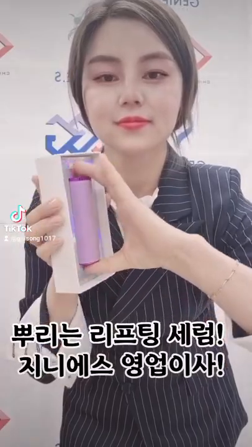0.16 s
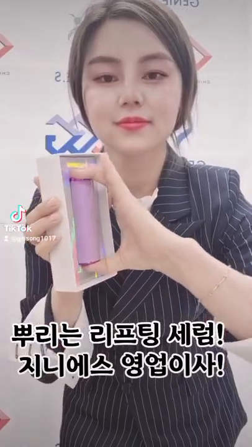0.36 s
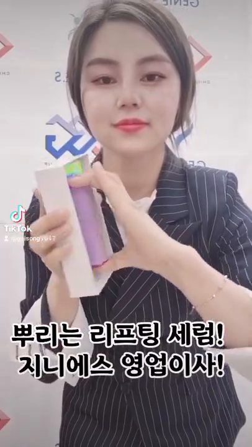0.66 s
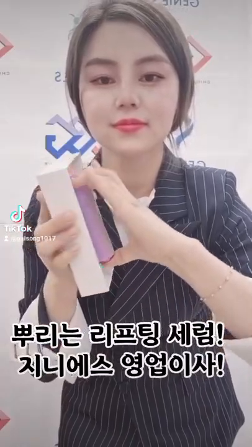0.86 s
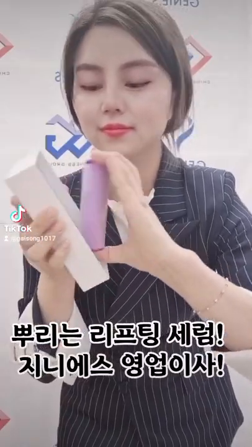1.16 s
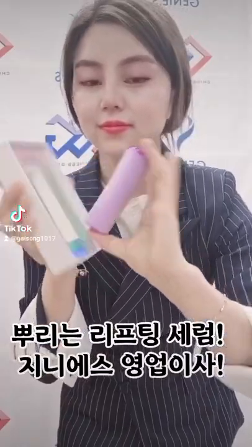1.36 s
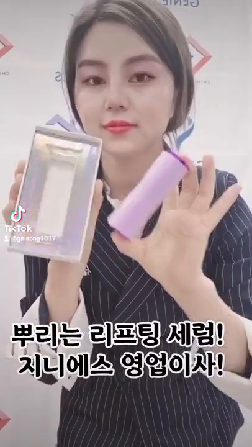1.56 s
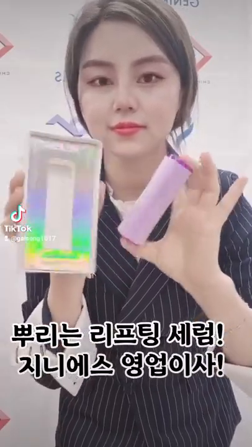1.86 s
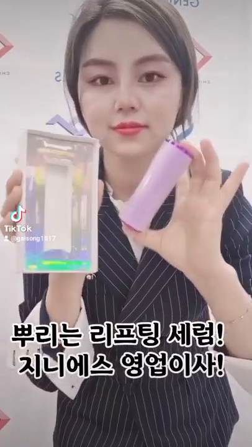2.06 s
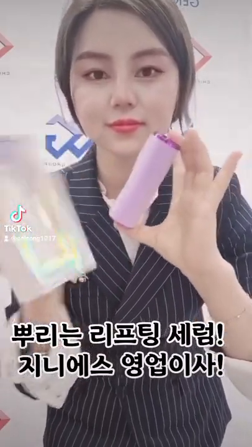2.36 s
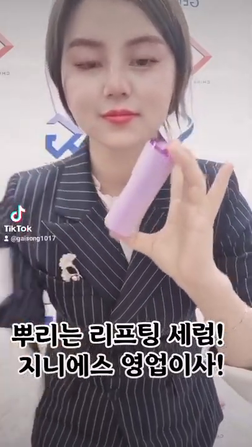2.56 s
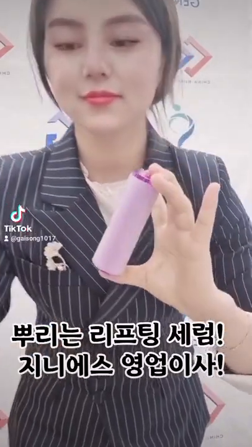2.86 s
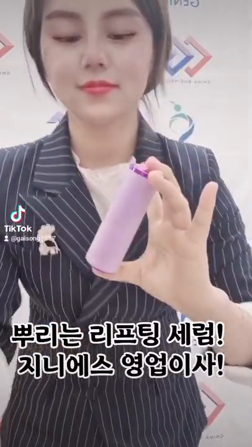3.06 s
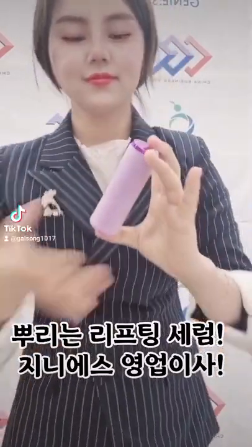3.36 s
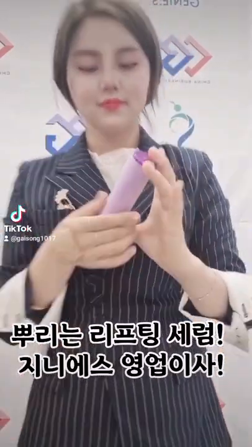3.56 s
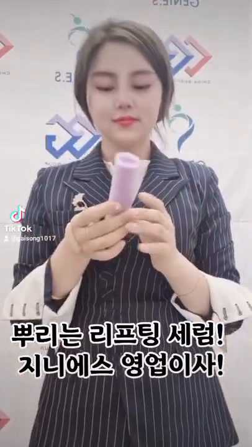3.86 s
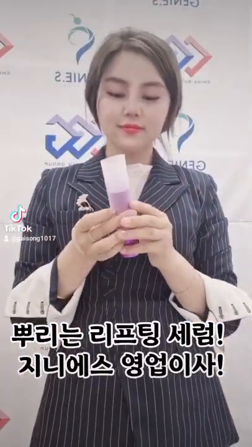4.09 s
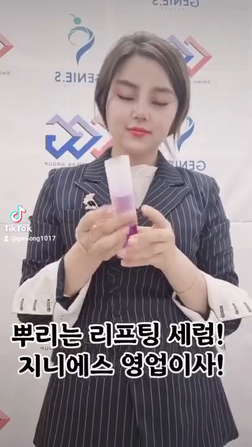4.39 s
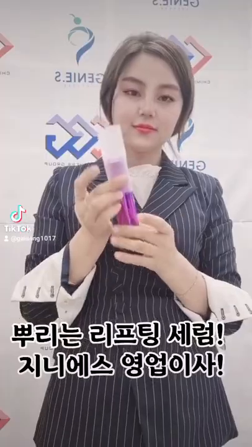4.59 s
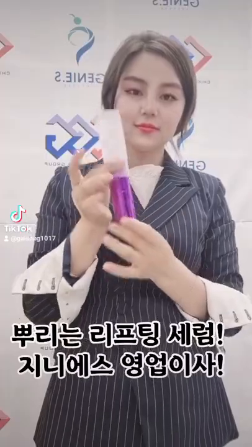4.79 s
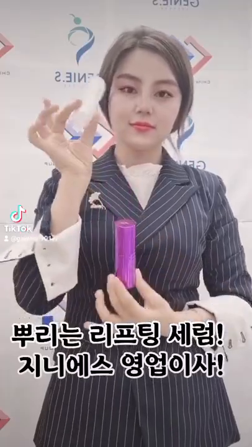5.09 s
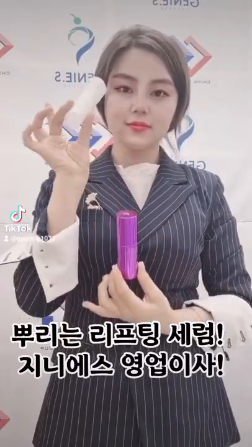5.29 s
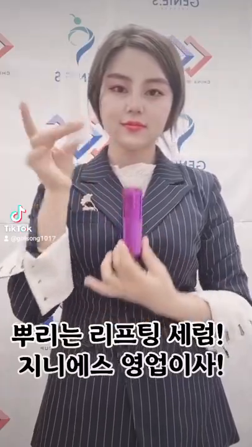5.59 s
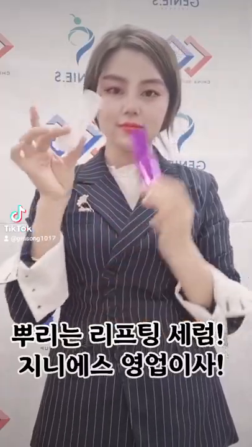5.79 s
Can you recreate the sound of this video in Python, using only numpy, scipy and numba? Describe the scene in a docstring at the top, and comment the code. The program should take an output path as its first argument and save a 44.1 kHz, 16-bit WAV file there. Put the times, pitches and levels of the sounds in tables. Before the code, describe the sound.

Faint rubbing and plastic ticks in a quiet room, broken by a cardboard box clattering onto a table, then a cap clicks off.

```python
"""A cardboard box drops on a table, bounces and settles, its contents rattling: each impact flexes a panel
and excites the damped modes of box and table top. Beforehand a bottle is worked out of the tight box, its
friction noise filtered by a hollow of rising pitch; afterwards its cap is pulled off. The plastic ticks by
resonance and rasps by stick-slip. Jacket cloth rustles with the arms, ventilation and far traffic rumble
under microphone hiss, and the quiet room reverberates briefly."""
import sys
import numpy as np
from scipy import signal
from scipy.fft import rfft, irfft
from scipy.io import wavfile
from scipy.ndimage import uniform_filter1d
from numba import njit

SR = 44100
rng = np.random.default_rng(int(sys.argv[2]) if len(sys.argv) > 2 else 0)


def dump_mix(stems):
    """Bounce the given channels to the path in sys.argv[1] as a 16-bit WAV at rate SR."""
    frames = np.atleast_2d(stems).T  # one column per channel
    limited = np.clip(frames, -1, 1)  # hard clip at full scale
    pcm = np.round(limited * 32767).astype(np.int16)
    wavfile.write(sys.argv[1], SR, pcm)


N = 261954
T = np.arange(N) / SR

# Impacts of the box: t/s, peak level/dB, contact time/ms, panel f/Hz, crack level/dB re impact
IMPACTS = [(2.838, 0, 1.21, 340, -16), (2.8458, -8.5, 0.87, 380, -25.5), (2.854, -6.5, 0.84, 499.8, -24.5),
           (2.874, -6, 0.91, 419, -21.5), (2.8846, -15, 0.76, 391, -29.5),
           (2.9022, -21.5, 0.62, 450, -31.5), (2.9148, -10.5, 0.87, 406, -20.5),
           (2.9425, -13, 0.6, 990, -5), (2.956, -26, 0.44, 601, -8.5), (2.9669, -28.5, 1, 497.6, -11),
           (2.992, -20.5, 0.96, 700, -15), (3.1022, -28.5, 1.4, 200, -27),
           (3.1295, -17.5, 1.43, 600, -11.5), (3.1346, -6, 0.82, 618, -18.5),
           (3.1463, -12.5, 1.48, 209.7, -29.5), (3.151, -15.5, 1.15, 613, -28),
           (3.161, -14.5, 0.81, 205, -27)]
# Modes of box and table top: f/Hz, relative level/dB, T60/s
BOX_MODES = [(87, 12, 0.1), (145, 5, 0.071), (184.7, 17, 0.08), (270.9, 16.5, 0.064), (351, 4.5, 0.06),
             (450, 5.5, 0.096), (499, 1.5, 0.026), (622, -6.5, .06), (682, -2.5, 0.019), (810, -5, 0.14),
             (920, -9.5, 0.036), (1231, -7.5, .03), (1600, -13.5, 0.052), (1950, -6, .025),
             (2900, -6.5, 0.018), (4360, -6.5, .012)]
# Plastic ticks: t/s, peak level/dB, f/Hz, decay time/ms, snap level/dB re tone, knock level/dB re tone
PLASTIC_TICKS = [(0.083, -50.5, 3000, 1.6, -5, -32), (.444, -45, 900, 2.2, -8, -23),
                 (0.469, -44.5, 2720, 5.2, -21, -5.5), (.487, -82, 2400, 2., -30, -21),
                 (0.524, -47, 2530, 5.9, -1, 4), (0.668, -37.5, 1140, 2.9, 0, -32),
                 (0.679, -37, 3050, 1.16, -10, -12), (0.706, -46.5, 2750, 6.6, -25, -13),
                 (0.899, -50.5, 1360, 3.1, -6, -30), (1.05, -26.5, 1530, 2.1, -8, -7.5),
                 (1.546, -47.5, 4060, 0.97, -35, -38), (1.7017, -53, 2420, 1.9, -19, -10),
                 (2.435, -54.5, 3520, 2, -13, -42), (2.474, -48, 4700, 2.1, 1, -28),
                 (3.554, -51, 3164, 2.5, -9.5, -40), (4.278, -54, 4630, 1.8, -23, -40),
                 (4.355, -56.5, 4030, 5., -14, -37), (4.855, -49.5, 1000, 3.6, -10, -28),
                 (4.872, -51, 4200, 2.2, 0, -22), (4.886, -33, 1488, 3.07, 11, -15)]
# Plastic rasping as it slips, and the contents rattling as the box bounces (2.859 to 2.992 s):
# t/s, level/dB, rise/ms, hold/ms, fall/ms, treble level/dB re level
RASPS_AND_RATTLES = [(.44, -79, 10, 56, 10, 5), (.47, -68.5, 6.6, 71, 14, -4.5),
                     (0.684, -55, 40, 3, 6.8, 2.5), (.706, -89, 25, 1, 72, -8),
                     (1.049, -47, 6, 2.8, 3.2, -18), (2.859, -48, 3, 72, 22, -5),
                     (2.95, -42, 3, 12.3, 21.6, -8), (2.992, -47.5, 20, 1.3, 55, -3),
                     (4.867, -59, 11, 9, 3.5, -3), (4.88, -51, 12.3, 5.6, 13.5, 3.5),
                     (4.892, -49.5, 2.65, 3, 7.5, -7)]
# Tugs on the bottle in the box: t/s, level/dB, rise/ms, hold/ms, fall/ms
BOTTLE_TUGS = [(.476, -57.5, 51, 5, 160), (.66, -57, 5.4, 15, 106), (.822, -61.5, 240, 5.4, 71),
               (.9, -69.5, 8, 180, 29), (1.045, -59.5, 18, 33, 130), (1.12, -63, 30, 20, 30)]
# Scrapes of card and cap: t/s, level/dB, rise/ms, hold/ms, fall/ms, resonance f/Hz
SHORT_SCRAPES = [(.475, -62.5, 8.8, 55, 16, 2480), (1.055, -59, 3, 12, 89, 3440),
                 (1.715, -70.5, 15, 46, 40, 2660), (4.25, -71.5, 25, 34, 30, 1710),
                 (4.36, -79, 80, 90, 71, 1470)]
# Rustle of sleeves and hands: t/s, fold level/dB, weave level/dB
CLOTH_LEVELS = [(0, -75, -75.5), (.1, -73.5, -78.5), (.24, -84, -85.5), (.45, -77, -74), (.78, -70, -75.5),
                (.89, -79, -81), (.93, -73.5, -77), (1.22, -79, -79), (1.38, -76.5, -71),
                (1.58, -77, -72.5), (1.69, -80, -80), (1.71, -70, -66.5), (1.76, -77, -75),
                (1.85, -76.5, -79), (2.2, -86, -78), (2.36, -85, -83), (2.49, -71, -68.5),
                (2.6, -63.5, -63.5), (2.72, -67.5, -66.5), (2.82, -63.5, -53), (3.102, -83, -67),
                (3.35, -64.5, -71), (3.69, -68.5, -72), (3.89, -77, -75.5), (3.94, -67.5, -62),
                (4.0, -69, -64.5), (4.03, -68, -71), (4.11, -67.5, -73.5), (4.21, -77.5, -80),
                (4.32, -71, -72.5), (4.46, -79.5, -79), (4.59, -74, -77), (4.84, -74.5, -73),
                (5.04, -66.5, -73.5), (5.2, -80, -79), (5.41, -86, -81.5), (5.67, -76.5, -77),
                (5.94, -76, -77)]
# Spectrum of rustling folds: f/Hz, relative level/dB
FOLD_SPECTRUM = [(600, -2.5), (1200, -2.5), (2000, -9), (3000, -6.5), (4500, -7), (6500, -12.5),
                 (9000, -33.5)]
# Treble spectrum of the weave, rasps and rattles: f/Hz, relative level/dB
TREBLE_SPECTRUM = [(4500, -15), (6300, -4), (8000, 1), (10000, -6.5), (11500, -6), (13000, 2.5),
                   (15500, -9)]
# Reverberation time of the room: f/Hz, T60/s
ROOM_DECAY = [(100, 0.65), (300, 0.26), (1000, 0.34), (3000, 0.57), (8000, 0.43), (15000, 0.17)]
# Spectrum of ventilation and far traffic: f/Hz, relative level/dB
VENTILATION_SPECTRUM = [(12, -36.5), (24, -17), (38, -6.5), (54, 1), (112, -17), (202, -14), (232, -26),
                        (259, -23), (320, -29), (536, -43.5), (851, -36.5), (1050, -45.5), (1400, -52),
                        (1820, -86), (3080, -120)]
# Course of the deep rumble: t/s, level/dB
RUMBLE_LEVELS = [(0, -61), (.43, -58), (1.4, -61), (2.0, -57.5), (2.27, -67), (2.4, -57), (3.6, -60.5),
                 (4.3, -57.5), (4.75, -58.5), (5.25, -54.5), (5.5, -60), (5.94, -55)]
# Spectrum of microphone hiss: f/Hz, relative level/dB
HISS_SPECTRUM = [(590, -25.5), (1000, 2), (1320, -15), (1810, -8), (2560, -18), (5700, -10), (6700, -24),
                 (14600, -8.5), (16000, -5)]
# Spectra of an impact's crack and of the rasps and rattles: f/Hz, relative level/dB
CRACK_SPECTRUM = [(1000, 1.5), (2500, 1), (4300, -4), (7000, -17.5), (15000, -21.5)]
RASP_RATTLE_SPECTRUM = [(300, -27), (600, -5.5), (1200, -3.5), (1900, -3.5), (2700, -6.5), (4200, -4),
                        (6000, -7), (8000, -28)]


def box_impacts(panel_t60=0.036, crack_decay_ms=2.2):
    """Impact excitation: a force pulse rings the panel and the modes; longer contact sounds duller."""
    out, t = np.zeros(N), np.arange(SR // 4) / SR
    for start, db, contact_ms, panel_hz, crack_db in IMPACTS:
        force = np.sin(np.pi * np.clip(t * 1000 / contact_ms, 0, 1)) ** 2
        jolt = np.gradient(force)  # radiation follows the change of the force
        spot_db = 1.4 * rng.standard_normal(len(BOX_MODES))  # each contact point favours other modes
        modes = sum(undb(mode_db + offset_db) * damped_mode(jolt, hz, t60)
                    for (hz, mode_db, t60), offset_db in zip(BOX_MODES, spot_db))
        panel = np.gradient(damped_mode(jolt, panel_hz, panel_t60)) * SR / (2 * np.pi * panel_hz)
        body = -panel - undb(-24 - 1.14 * db) * modes  # weaker impacts leave the modes a larger share
        crack = colour(rng.standard_normal(len(t)), CRACK_SPECTRUM) * np.exp(-t * 1000 / crack_decay_ms)
        add(out, start, undb(db) * (body / abs(body).max() + undb(crack_db) * crack))
    return out


def plastic_ticks(snap_hz=4500, knock_hz=480):
    """Transient resonance: a noise burst excites a tone in the plastic, a broad snap and a box knock."""
    out, t = np.zeros(N), np.arange(SR // 16) / SR
    for start, db, hz, decay_ms, snap_db, knock_db in PLASTIC_TICKS:
        tau = decay_ms / 1000
        rise = np.minimum(t / (.3 * tau), 1)
        burst = rng.standard_normal(len(t)) * rise * np.exp(-t / tau)
        tone = unit(bandpass(burst, hz, q=4.5))
        snap = unit(bandpass(burst, snap_hz, q=.45))
        knock = unit(bandpass(burst, knock_hz, q=3.))
        tick = tone + undb(snap_db) * snap + undb(knock_db) * knock
        add(out, start, undb(db) * tick / abs(tick).max())
    return out


def rasps_and_rattles():
    """Dense contacts merge into noise: plastic rasps as it slips, contents rattle as the box bounces."""
    grains = grainy_noise(1.8)
    gains = stroke_envelopes(RASPS_AND_RATTLES) * undb(2.7 * wander(150))
    treble_shares = undb([row[-1] for row in RASPS_AND_RATTLES])
    middle = gains.sum(axis=0) * colour(grains, RASP_RATTLE_SPECTRUM)
    treble = (treble_shares @ gains) * colour(grains, TREBLE_SPECTRUM)
    return middle + treble


def bottle_rubbing():
    """Cavity resonance: the hollow between bottle and box rises in pitch as they part."""
    hollow_hz = np.interp(T, [0.49, 0.92], [945, 1380])
    return stroke_envelopes(BOTTLE_TUGS).max(axis=0) * resonant_friction(hollow_hz)


def scrapes():
    """Sliding friction: each short scrape of card or cap drives one fixed resonance."""
    gains = stroke_envelopes(SHORT_SCRAPES)
    return sum(gain * resonant_friction(row[-1]) for gain, row in zip(gains, SHORT_SCRAPES))


def cloth_rustle(fold_hz=3400):
    """Friction of fabric: folds rustle brighter or duller as they turn; the fine weave hisses above."""
    times, folds_db, weave_db = np.transpose(CLOTH_LEVELS)
    folds = colour(grainy_noise(1.6), FOLD_SPECTRUM)
    centre_hz = fold_hz * np.exp(.1 * wander(4))
    folds = unit(folds + 0.72 * bandpass(folds, centre_hz, q=1.1))
    folds_gain = undb(np.interp(T, times, folds_db) + wander(27))
    weave_gain = undb(np.interp(T, times, weave_db) + 1.2 * wander(30))
    weave = colour(grainy_noise(2.2), TREBLE_SPECTRUM)
    return folds_gain * folds + weave_gain * weave


def reverberation(x, level_db=-14, build_up_s=0.0073):
    """Diffuse field: noise bands half an octave apart each decay exponentially at their own rate."""
    t, tail = np.arange(SR) / SR, 0
    table_hz, table_t60 = np.transpose(ROOM_DECAY)
    for hz in 63 * 2 ** np.arange(0, 8.1, .5):
        t60 = np.interp(np.log(hz), np.log(table_hz), table_t60)
        tail += bandpass(rng.standard_normal(SR), hz, q=2.5) * undb(-60 * t / t60)
    tail *= np.clip(t / build_up_s, 0, 1)
    return undb(level_db) * signal.fftconvolve(x, tail / np.sqrt(np.sum(tail ** 2)))[:N]


def ventilation(split_hz=110, drone_db=-63.5, swell_db=2.04):
    """Amplitude modulation: the rumble and higher drone of vents and far traffic swell independently."""
    noise = colour(rng.standard_normal(N), VENTILATION_SPECTRUM)
    deep = signal.sosfiltfilt(signal.butter(2, split_hz, fs=SR, output="sos"), noise)
    rumble_gain = undb(np.interp(T, *np.transpose(RUMBLE_LEVELS)) + swell_db * wander(4))
    drone_gain = undb(drone_db + swell_db * wander(4))
    return rumble_gain * unit(deep) + drone_gain * unit(noise - deep)


def microphone_hiss(level_db=-75):
    """Self-noise: a stationary, coloured Gaussian floor."""
    return undb(level_db) * colour(rng.standard_normal(N), HISS_SPECTRUM)


def resonant_friction(hz):
    """Source and filter: flickering friction noise heard through a hollow resonant at hz."""
    flicker = undb(1.2 * wander(40))
    band = bandpass(grainy_noise(1.1), hz, q=2.9)
    return flicker * unit(bandpass(band, hz, q=2.9))


def grainy_noise(scatter_db):
    """Tiny random impulses of uneven size make a grainy noise; rms 1."""
    return unit(rng.standard_normal(N) * undb(scatter_db * np.minimum(rng.exponential(size=N), 5)))


def stroke_envelopes(table, edge_db=20):
    """Exponential growth and decay: each row is full from its time t; rise and fall span edge_db."""
    full_at, db, rise, hold, fall = np.transpose([row[:5] for row in table])[:, :, None]
    ms = (T - full_at) * 1000
    edges_below = np.maximum(-ms / rise, 0) + np.maximum((ms - hold) / fall, 0)
    return undb(db - edge_db * np.minimum(edges_below, 6))


def wander(rate_hz):
    """Random modulation: values held for 1 / rate_hz and smoothed; spread near 1."""
    hold = int(SR / rate_hz)
    steps = np.repeat(rng.standard_normal(N // hold + 1), hold)
    return 1.3 * uniform_filter1d(uniform_filter1d(steps, hold), hold)[:N]


def damped_mode(x, hz, t60):
    """Damped harmonic oscillator driven by x; it falls 60 dB in t60 seconds."""
    pole = np.exp(2j * np.pi * hz / SR - np.log(1000) / (t60 * SR))
    return signal.lfilter([1], [1, -pole], x).imag


@njit
def bandpass(x, hz, q):
    """Second-order resonance with gain 1 at its centre, which may be fixed or moving."""
    y, band_state, low_state = np.empty(len(x)), 0., 0.
    for i, g in enumerate(np.tan(np.pi * hz * np.ones(len(x)) / SR)):
        band = (band_state + g * (x[i] - low_state)) / (1 + g * (g + 1 / q))
        band_state = 2 * band - band_state
        low_state += 2 * g * band
        y[i] = band / q
    return y


def colour(x, spectrum):
    """Spectral shaping by points of f/Hz, level/dB; rms 1."""
    hz, db = np.transpose(spectrum)
    f = np.fft.rfftfreq(len(x), 1 / SR) + 1
    gain = undb(np.interp(np.log(f), np.log(hz), db))
    return unit(irfft(rfft(x) * gain, len(x)))


def undb(db):
    """Amplitude ratio of a level in decibels."""
    return 10 ** (np.asarray(db) / 20)


def unit(x):
    """Normalisation to rms 1."""
    return x / np.sqrt(np.mean(x ** 2))


def add(out, start_s, x):
    """Superposition of x on out from start_s."""
    i = int(start_s * SR)
    out[i:i + len(x)] += x[:len(out) - i]


def scene():
    """Linear superposition of box and bottle, their reverberation, the cloth and the background."""
    handling = box_impacts() + plastic_ticks() + rasps_and_rattles() + bottle_rubbing() + scrapes()
    return (handling + reverberation(handling) + cloth_rustle() + ventilation() + microphone_hiss())[None]


def record(dry, cutoff_hz=15500):
    """Soft saturation rounds the loudest peaks; a steep low-pass cuts the top."""
    return signal.sosfilt(signal.ellip(10, .2, 80, cutoff_hz, fs=SR, output="sos"), np.tanh(dry))


dry = scene()
out = record(dry)
dump_mix(out)
```